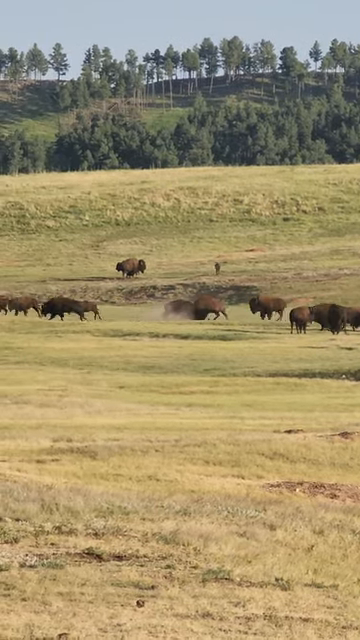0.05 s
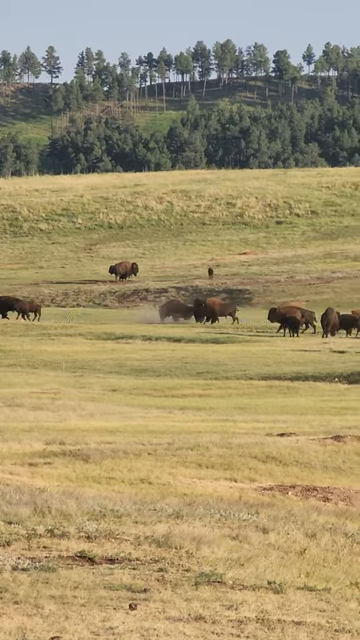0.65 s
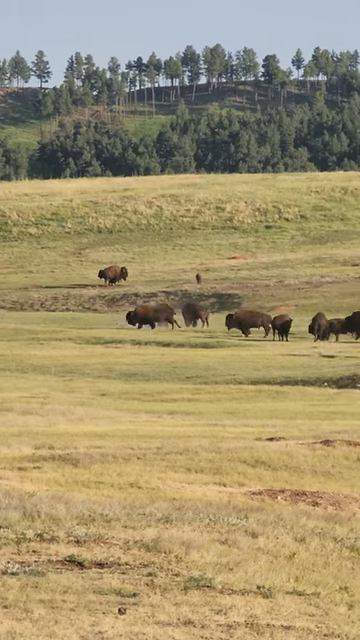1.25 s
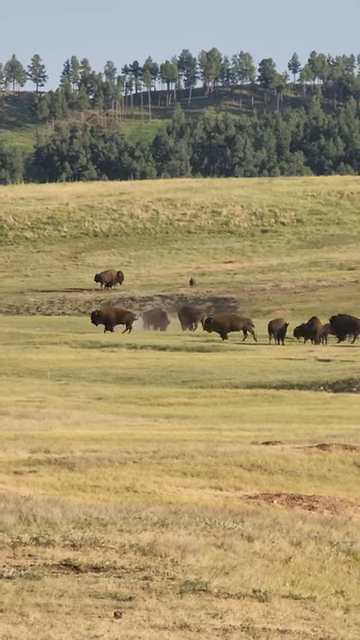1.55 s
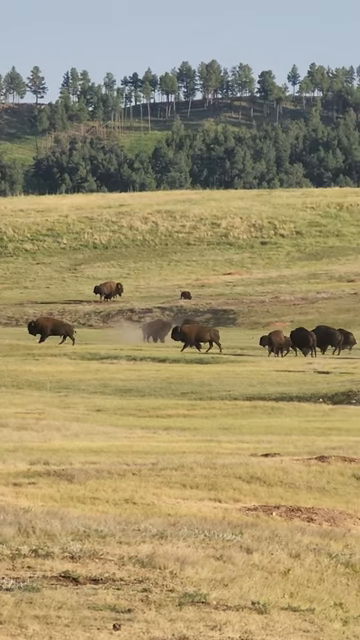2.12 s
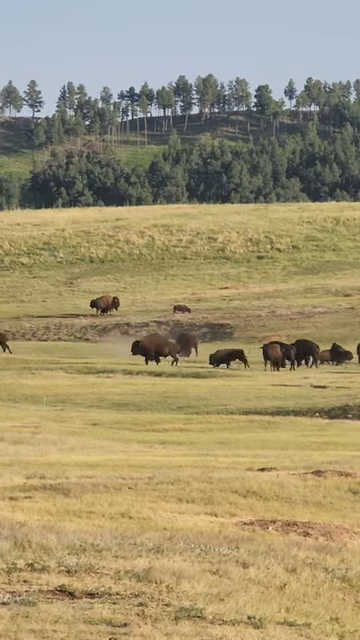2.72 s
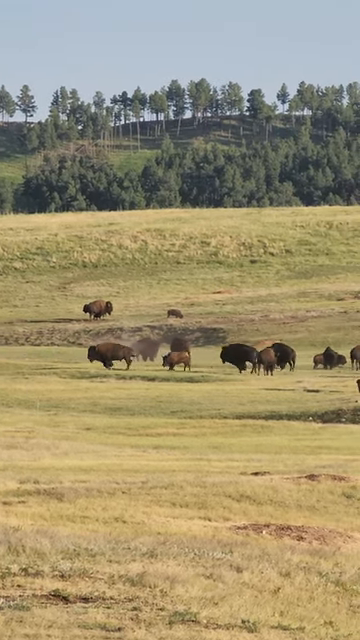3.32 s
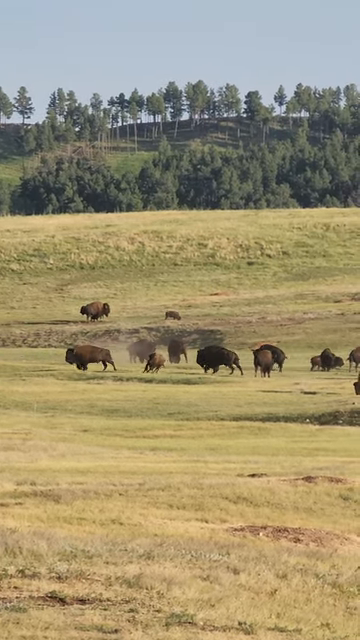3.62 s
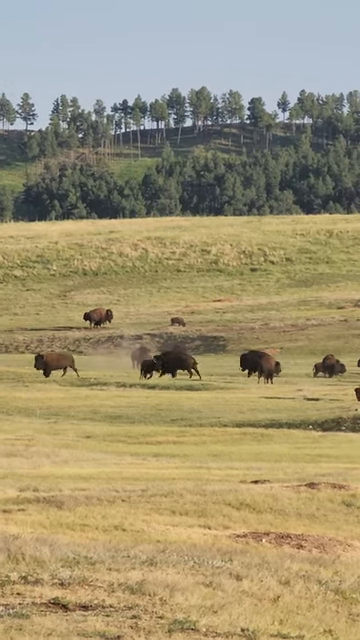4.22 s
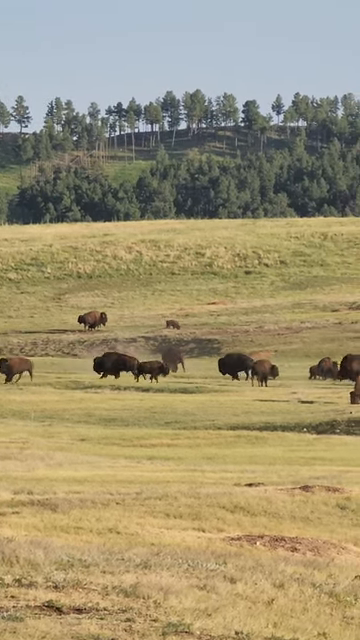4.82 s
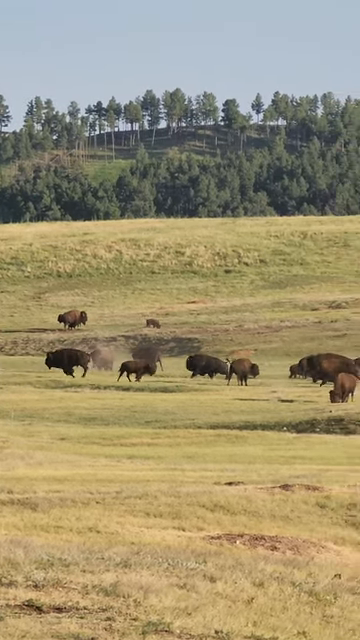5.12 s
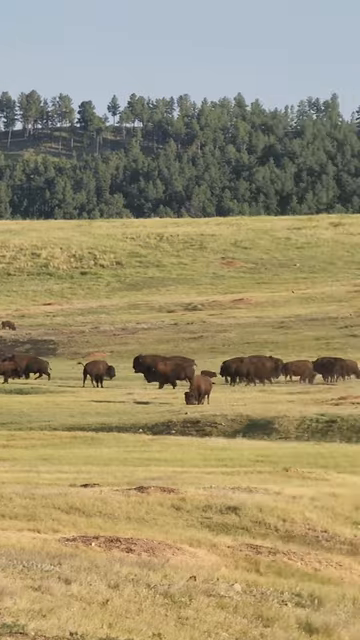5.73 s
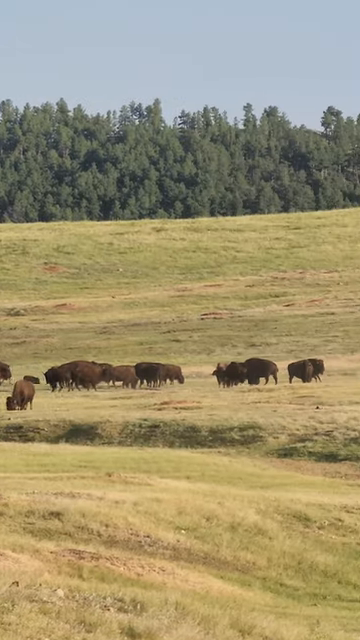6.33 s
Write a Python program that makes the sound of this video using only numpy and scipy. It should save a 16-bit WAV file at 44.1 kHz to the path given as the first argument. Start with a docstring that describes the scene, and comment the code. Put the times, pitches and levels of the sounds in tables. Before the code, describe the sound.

On an open grassy plain, light wind rumbles and thumps on the microphone, mostly on the left, over a steady wash of air. A car out of sight approaches with a fine hiss and a few tiny ticks of grit. A small animal chirps faintly in the distance. About halfway through, a hollow tyre roar rises and swells twice as the car goes by, with the wind continuing.

```python
"""Open grassland. From the start, turbulence in a light wind rumbles on the microphone, buffeting
mostly its left port, over a wash of air and a faint hum. Something out of sight, probably a car,
approaches with a fine hiss and ticks of grit, while a gust rustles dry grass. A small animal chirps
far away, once near 1 s and twice near 3 s. Then a hollow tyre roar takes over and swells twice
as the car goes by, its bearing drifting across the two ports."""
import sys
import numpy as np
from scipy import signal
from scipy.fft import rfft, irfft
from scipy.io import wavfile
from scipy.ndimage import uniform_filter1d

SR = 44100
rng = np.random.default_rng(int(sys.argv[2]) if len(sys.argv) > 2 else 0)


def transcribe(signal):
    """Save signal, clipped to [-1, 1], as a 16-bit WAV file at the path in sys.argv[1]."""
    frames = np.atleast_2d(signal).T
    limited = np.clip(frames, -1, 1)
    pcm = np.round(limited * 32767).astype(np.int16)
    wavfile.write(sys.argv[1], SR, pcm)


N = 289296
FRAME, HOP = 2048, 512  # samples
HZ = np.fft.rfftfreq(FRAME, 1 / SR)
TIMES = np.arange(N // HOP + 5)[:, None] * HOP / SR


def tyres():
    """Common modulation: moving air makes wide bands of the hiss and the roar flicker together."""
    flutter = patches(frames=3, bins=300)
    return tyre_hiss(flutter) + tyre_roar(flutter)


def tyre_roar(flutter):
    """Addition of powers: one passing car's roar swells and eases; overlapping swells blend in colour."""
    # f/Hz, relative level/dB, left-right/dB, coherence, left lead/rad
    spectrum = [(647,-29,-6,0.28,0.36), (820,-13,1.5,0.94,0.092), (873,-22,-3,1,.2),
                (1055,-12,-1.5,0.86,0.28), (1163,-1.5,-5,1,0.55), (1330,2,0.5,0.86,0.45),
                (1480,3.5,-6,0.86,1.38), (1617,-1.5,-0.5,0.99,1.1), (1904,-5,4.5,0.86,1.4),
                (2050,-9,6.5,0.23,3.2), (2240,-7.5,-3,.85,5.9), (2380,-11,-10,0.99,5.5),
                (2700,-13.5,-4,0.85,7.4), (3120,-16,-5,0.81,7), (3310,-19,-1,0.98,6.6),
                (3620,-25,-1.5,0.5,4.5), (3840,-24,-9,0.5,7.3), (4260,-29.5,-10.5,.5,8.5),
                (4800,-32,-4.5,0.43,8.5)]
    # t/s, level before colouring/dB, half-power half-width/s, tilt/(dB/octave)
    swells = [(3.282, -45.5, 0.072, 7), (3.996, -39.5, 0.34, -3.5), (4.22, -34.5, 0.14, -5),
              (4.698, -39, 0.4, -0.3), (5.722, -37.5, 0.23, -1), (6.196, -34, 0.064, -3),
              (6.347, -34, 0.51, -3)]
    onset_s, rise_db_per_s, settle_s = 3.04, 60, 0.34  # out from cover quickly, brighter at first
    peak_s, db, half, swell_tilt = np.transpose(swells)
    powers = gain_of(db) ** 2 / (1 + ((TIMES - peak_s) / half) ** 2)
    power = powers.sum(axis=1, keepdims=True)
    age = np.maximum(TIMES - onset_s, 0)
    level_db = 10 * np.log10(power) - rise_db_per_s * np.clip(onset_s - TIMES, 0, 1)
    level_db = level_db + roar_bands(age) + 2.02 * patches(frames=8, bins=3) + 0.89 * flutter
    tilt_db = (powers / power) @ swell_tilt[:, None] + 6.5 * np.exp(-age / settle_s)
    lead_ms = 0.022 * (TIMES - 5.0)  # the bearing drifts
    return port_noise(spectrum, level_db, skirt_db=31.0, tilt_db=tilt_db, lead_ms=lead_ms)


def roar_bands(age):
    """Spectral peaks, in dB: a bright one relaxes downward; a brief low one hollows the roar."""
    first_hz, last_hz, first_db, last_db, glide_s = 3560, 2470, 6.3, 3.4, 0.62
    remaining = np.exp(-age / glide_s)
    centre_hz = last_hz + (first_hz - last_hz) * remaining
    bright_db = (last_db + (first_db - last_db) * remaining) * bell(HZ, centre_hz, width=430)
    hollow_db = 13.3 * bell(TIMES, centre=5.63, width=0.11) * bell(HZ, centre=875, width=190)
    return bright_db + hollow_db


def tyre_hiss(flutter):
    """A moving noise source: it builds and dulls, and its arrival-time difference shifts with bearing."""
    # f/Hz, relative level/dB, left-right/dB, coherence, left lead/rad
    spectrum = [(820,-0.5,-1.5,0.96,0), (1070,-25,-0.5,0.89,0), (1320,4,1,1,-0.5), (1950,3,1,0.85,0.87),
                (2300,0,4.5,.6,3.5), (2440,-5,-2.5,0.8,4), (2670,-2,-9,0.62,3.5), (3000,-9.5,3,1,7),
                (3600,-10.5,-5,0.92,4), (4120,-10.5,-4,.9,4.5), (4600,-14,-6,0.99,4),
                (4850,-18,-14,0.56,4.5), (5400,-16,-7,0.94,4), (5900,-20.5,-0.5,.7,4),
                (6300,-20.5,-4,0.57,5), (6800,-22.5,-12.5,0.6,3.5), (7540,-18.5,-13.5,.75,5.5),
                (8240,-27.5,3.5,.5,2.5), (9100,-37,11.5,.2,10), (10200,-36,5.5,.52,5.5),
                (12000,-34.5,3.5,.35,1), (15500,-38.5,4,.15,4)]
    pass_db = -49.5 + rise_hold_fall(1.9, 3.68, rise_db_per_s=6.7, fall_db_per_s=7.9)
    floor_db = -57.5 + 0.5 * TIMES
    level_db = np.maximum(pass_db, floor_db) + hiss_bands()
    level_db = level_db + 1.1 * patches(frames=7, bins=14) + 1.5 * flutter
    tilt_db = np.interp(TIMES, (1.74, 4), (3, -2.5))
    lead_ms = 0.03 * (TIMES - 1.77)
    return port_noise(spectrum, level_db, skirt_db=2.5, tilt_db=tilt_db, lead_ms=lead_ms)


def hiss_bands():
    """Time-varying filtering, in dB: narrow bands slide through the hiss, then hold."""
    # start t/s, end t/s, first f/Hz, last f/Hz, half-width/Hz, first lift/dB, last lift/dB
    glides = [(.9, 1.9, 5200, 5590, 281, 7.3, 6), (1.3, 2.2, 2520, 1970, 200, -4, 1)]
    lift_db = 0
    for start, end, first_hz, last_hz, width_hz, first_db, last_db in glides:
        centre_hz = np.interp(TIMES, (start, end), (first_hz, last_hz))
        lift_db += np.interp(TIMES, (start, end), (first_db, last_db)) * bell(HZ, centre_hz, width_hz)
    return lift_db


def grit():
    """Impulsive excitation: tiny snaps of grit decay exponentially, louder on the right."""
    # t/s, onset level on the right/dB, centre f/Hz, decay time/s
    ticks = [(.997, -49, 4500, 0.0018), (1.366, -50, 4200, .003), (1.4529, -42, 6000, .0006),
             (1.462, -35.5, 5300, 0.001), (1.5838, -40, 6000, 0.0006), (1.5838, -38, 12000, .0006)]
    out, count = np.zeros((2, N)), 2 ** 11
    t = np.arange(count) / SR
    for s, db, hz, decay in ticks:
        snap = unit_rms(band_noise(count, hz, octaves=0.39)) * np.exp(-t / decay)
        add(out, s, snap * gain_of([[db - 7], [db]]))
    return out


def wind():
    """Turbulent pressure at the ports: a lumpy rumble that slowly eases, with gusts and lulls."""
    # f/Hz, relative level/dB, left-right/dB, coherence, left lead/rad
    spectrum = [(20, -11, 8, .5, -0.4), (34, -4.5, 6.5, 0.9, -0.45), (52, 1.5, 4.5, 0.3, -0.5),
                (65, -2, 8, 0.6, 0.12), (94, -5.5, -4, 0.99, -1.3), (143, -10, 1, 1, 0.16),
                (224.7, -14, -1, 0.99, -0.4), (273, -21, -0.5, 0.95, -0.11), (370, -32, -3.5, 0.94, 0.28),
                (567, -45.5, -1.5, 0.92, 0.048)]
    # t/s, lift/dB, half-width/s
    gusts = [(.72, 0, 0.45), (1.248, 2.5, 0.3), (1.683, -1.5, 0.25), (2.163, 3, 0.32), (2.73, -3, 0.083),
             (2.93, 3, 0.12), (3.525, 3.5, 0.2), (4.087, 2.5, 0.18), (4.45, -2.5, .09), (4.666, -5, 0.062),
             (5.25, 1.5, 0.62), (5.802, -1.5, 0.11), (6.353, -2, 0.15)]
    breeze_db = -33.5 - 0.14 * TIMES
    gust_db = sum(db * bell(TIMES, s, half) for s, db, half in gusts)
    lumps_db = 0.69 * patches(frames=5, bins=8) + patches(frames=7, bins=60)
    return port_noise(spectrum, breeze_db + gust_db + lumps_db, skirt_db=22.0)


def buffets():
    """Eddies striking the microphone: each gives a few irregular low swings of pressure."""
    # t/s, left level before the low-pass/dB, duration/s, centre f/Hz, left-right/dB
    eddies = [(0.662, -23, 0.025, 90, 10), (0.735, -27.5, 0.029, 80, 3), (0.79, -27.5, 0.037, 115, 18),
              (0.937, -24.5, 0.013, 95, 19), (1.084, -19, 0.0071, 112, 12), (1.167, -19.5, 0.038, 86, 10),
              (1.412, -31, 0.027, 75, 1), (1.796, -26.5, 0.051, 90, 11), (1.985, -23.5, 0.071, 68, 13),
              (2.025, -22, 0.029, 112, 7), (2.102, -21, 0.032, 83, 14), (2.295, -20, 0.035, 58, 7),
              (2.39, -17, 0.017, 65, 14), (2.412, -13, 0.011, 110, 10), (2.495, -32, 0.18, 177, 4.5),
              (2.701, -39, 0.11, 190, 0), (3.346, -26, 0.03, 55, 12), (3.659, -16.5, 0.014, 118.6, 21),
              (3.699, -29.5, 0.17, 64.4, 6), (3.835, -24, 0.067, 81, 14), (3.903, -25.5, 0.025, 65, 12),
              (3.975, -17, 0.035, 78, 15), (4.03, -25.5, 0.058, 75, 7), (4.565, -25.5, 0.04, 69.6, 5),
              (4.9, -15, 0.048, 68.5, 20), (5.098, -22.5, 0.039, 75, 16), (5.143, -14.5, 0.038, 77, 16),
              (5.19, -30, 0.025, 55, -4), (5.755, -28.5, 0.05, 70, -1), (5.85, -23.5, 0.094, 62, 7.5),
              (5.945, -20.5, 0.026, 67, 7), (6.07, -24.5, 0.044, 92, 7), (6.41, -22.5, 0.032, 55, 5),
              (6.488, -25.5, 0.029, 50, 8)]
    out, count = np.zeros((2, N)), 2 ** 14
    t = (np.arange(count) - count // 2) / SR
    for s, db, length, hz, balance_db in eddies:
        window = bell(t, 0, length / 2)
        swings = band_noise(count, hz, octaves=0.52)
        swings = swings + 0.19 * swings[::-1]  # partly shared by the two ports
        puff = swings / np.sqrt(np.abs(signal.hilbert(swings))) * window  # evens out their sizes
        puff *= np.linalg.norm(window) / np.linalg.norm(puff, axis=1, keepdims=True)
        add(out, s + t[0], puff * gain_of([[db], [db - balance_db]]))
    low_pass = signal.butter(4, 360, fs=SR, output="sos")  # small fast eddies carry little energy
    return signal.sosfiltfilt(low_pass, out)


def grass():
    """Flow-excited noise: one gust stirs dry grass into a thin, high rustle."""
    # f/Hz, relative level/dB, left-right/dB, coherence, left lead/rad
    spectrum = [(7000, 2, -6.5, .5, 6), (9000, -5.5, 11, .2, -8.5), (11000, -2, -2, .5, -5.5),
                (12200, 3, -4, .35, -7.5), (15500, -3.5, 6, .15, -6)]
    level_db = -67 + rise_hold_fall(1.2, 1.5, rise_db_per_s=16, fall_db_per_s=23)
    return port_noise(spectrum, level_db + 1.5 * patches(frames=4, bins=60), skirt_db=15.0)


def rustles():
    """Random amplitude modulation breaks noise into the crackle of dry stalks, slightly to the left."""
    # t/s, base level/dB, half-width/s, centre f/Hz
    flurries = [(.78, -74, .08, 12000), (1.19, -73, .05, 11500), (1.392, -67, .05, 8950),
                (1.467, -66, 0.024, 5800), (2.563, -73, .02, 10500), (6.11, -68.5, .03, 5500)]
    out, count = np.zeros((2, N)), 2 ** 14
    t = (np.arange(count) - count // 2) / SR
    for s, db, half, hz in flurries:
        crackle = unit_rms(gain_of(4.0 * waver(seconds=0.002)[:count]))
        flurry = unit_rms(band_noise(count, hz, octaves=0.39)) * crackle * bell(t, 0, half)
        add(out, s + t[0], flurry * gain_of([[db + 2], [db + 0.5]]))
    return out


def chirps():
    """Multipath propagation: scattering over the plain blurs a small animal's gliding whistles."""
    # t/s, direct level on the right/dB, duration/s, start f/Hz, end f/Hz, relative second harmonic/dB
    calls = [(1.106, -57, 0.022, 3810, 3510, -30), (2.929, -50.5, 0.028, 3340, 3880, -32),
             (2.969, -44, 0.054, 2176, 2270, -16)]
    scatter_s, scatter_db = 0.012, -3
    out = np.zeros((2, N))
    t = np.arange(2 ** 12) / SR
    for s, db, length, start_hz, end_hz, overtone_db in calls:
        count = int(length * SR)
        hz = np.linspace(start_hz, end_hz, count) * (1 + 0.012 * waver(seconds=0.003)[:count])
        phase = 2 * np.pi * np.cumsum(hz) / SR
        envelope = np.sin(np.linspace(0, np.pi, count))
        note = (np.sin(phase) + gain_of(overtone_db) * np.sin(2 * phase)) * envelope
        paths = rng.standard_normal((2, len(t))) * np.exp(-t / scatter_s)
        paths *= gain_of(scatter_db) / np.linalg.norm(paths[0])
        paths[:, 0] += 1  # the direct path
        add(out, s, signal.fftconvolve(note[None], paths, axes=1) * gain_of([[db - 2.0], [db]]))
    return out


def air():
    """Broadband ambient noise: the steady wash of the open plain, whose treble flickers."""
    # f/Hz, relative level/dB, left-right/dB, coherence, left lead/rad
    spectrum = [(353,-2.5,1,1,-0.062), (447,-1,-0.5,0.97,0.16), (684,-5.5,0.5,0.87,0.21),
                (990,-3,-1.5,0.86,-0.31), (1120,-5,-2,1,-0.47), (1380,-1.5,-1.5,0.86,0.3),
                (1950,-13,-1.5,0.16,-1.4), (2820,-18,-1.5,0.72,-0.92), (4100,-24,2.5,.6,-1.2),
                (4340,-25,-4,0.61,-0.25), (4550,-25,-4,0.37,0.15), (5500,-25.5,-2.5,0.81,-1),
                (5740,-28.5,-1,.2,-1.1), (7630,-28,-10.5,0.49,-1.1), (8100,-35,3.5,.2,-1),
                (9300,-50,12.5,.13,0), (10700,-43,9,.09,0), (12500,-41.5,-1.5,.07,0), (15500,-42,6,.04,0)]
    flicker_db = 1.1 * patches(frames=4, bins=400) * np.clip(HZ / 6000, 0, 1)
    level_db = -47 + 0.97 * patches(frames=9, bins=18) + flicker_db
    return port_noise(spectrum, level_db, skirt_db=2.0)


def hum():
    """Superposition of low tones drifting in pitch and strength, perhaps an idling engine."""
    # f/Hz, median rms level/dB
    tones = [(47, -42.5), (97, -46), (283, -61), (346, -63.5)]
    out = np.zeros(N)
    for hz, db in tones:
        cycles = np.cumsum(hz + 1.086 * waver(seconds=0.37)) / SR + rng.random()
        amplitude = np.sqrt(2) * gain_of(db + 2.67 * waver(seconds=0.15))
        out += amplitude * np.sin(2 * np.pi * cycles)
    return out


def port_noise(spectrum, level_db, skirt_db, tilt_db=0, lead_ms=0):
    """Partially coherent noise at two ports; skirt_db and tilt_db are slopes per octave."""
    f, *columns = np.transpose(spectrum)
    octave, known = np.log2(HZ + 1), np.log2(f)
    db, balance_db, coherence, phase = (np.interp(octave, known, c) for c in columns)
    octaves_outside = np.abs(octave - np.clip(octave, known[0], known[-1]))
    shape = gain_of(db - skirt_db * octaves_outside)
    treble_db = tilt_db * np.maximum(octave - np.log2(1400), -1)  # pivots at 1400 Hz, flat below 700 Hz
    amplitude = shape / np.linalg.norm(shape) * gain_of(level_db + treble_db)
    a, b, c, d = rng.standard_normal((4, len(TIMES), len(HZ)))
    coherence = np.clip(coherence, 0, 1)
    left = a + 1j * b
    right = coherence * left + np.sqrt(1 - coherence ** 2) * (c + 1j * d)
    right = right * np.exp(-1j * (phase + 2 * np.pi * HZ * lead_ms / 1000))
    side = gain_of(balance_db / 2)
    spectra = np.array([left * side, right / side]) * amplitude
    return signal.istft(spectra.transpose(0, 2, 1), nperseg=FRAME, noverlap=FRAME - HOP)[1][:, :N]


def band_noise(count, hz, octaves):
    """Two incoherent noises in a Gaussian band around hz."""
    f = np.fft.rfftfreq(count, 1 / SR) + 1
    band = np.exp(-0.5 * (np.log2(f / hz) / octaves) ** 2)
    return irfft(rfft(rng.standard_normal((2, count))) * band, count)


def patches(frames, bins):
    """A random field correlated over time and frequency, rms one."""
    field = rng.standard_normal((len(TIMES), len(HZ)))
    return unit_rms(uniform_filter1d(uniform_filter1d(field, frames, axis=0), bins, axis=1))


def waver(seconds):
    """Low-pass noise that changes about once in the given time, rms one."""
    f = np.fft.rfftfreq(N, 1 / SR)
    return unit_rms(irfft(rfft(rng.standard_normal(N)) * np.exp(-(f * seconds) ** 2), N))


def rise_hold_fall(start, end, rise_db_per_s, fall_db_per_s):
    """Exponential growth and decay in dB, zero from start to end."""
    return -rise_db_per_s * np.maximum(start - TIMES, 0) - fall_db_per_s * np.maximum(TIMES - end, 0)


def bell(x, centre, width):
    """A Gaussian of height one; width is its half-width at 1/e."""
    return np.exp(-((x - centre) / width) ** 2)


def gain_of(db):
    """Decibels to amplitude ratio."""
    return 10 ** (np.asarray(db) / 20)


def unit_rms(x):
    """Normalisation to an rms of one."""
    return x / np.sqrt(np.mean(np.abs(x) ** 2) + 1e-20)


def add(mix, s, sound):
    """Superposes a stereo sound at time s."""
    part = mix[:, max(0, round(s * SR)):][:, :sound.shape[1]]
    part += sound[:, :part.shape[1]]


def scene():
    """Linear superposition: the pressures of all sources add at the ports."""
    return wind() + buffets() + hum() + air() + grass() + rustles() + tyres() + grit() + chirps()


def record(dry):
    """Linear filtering: the ports absorb one narrow band, then a low-pass limits the bandwidth."""
    notch_hz, half_width_hz, depth_db, cutoff_hz = 9060, 290, 11, 15750
    f = np.fft.rfftfreq(N, 1 / SR)
    notch = gain_of(-depth_db / (1 + ((f - notch_hz) / half_width_hz) ** 2))
    heard = irfft(rfft(dry) * notch, N)
    low_pass = signal.firwin(511, cutoff_hz, window=("kaiser", 9), fs=SR)
    return signal.oaconvolve(heard, low_pass[None], "same")


dry = scene()
out = record(dry)
transcribe(out)
```